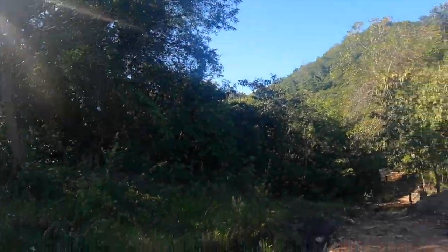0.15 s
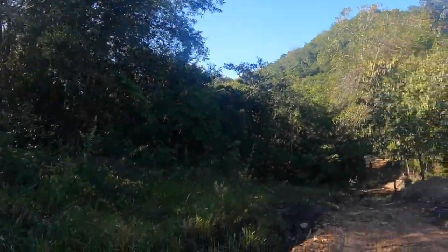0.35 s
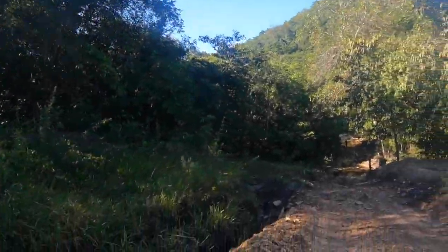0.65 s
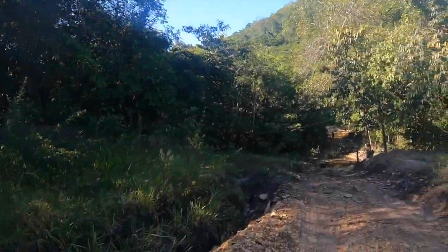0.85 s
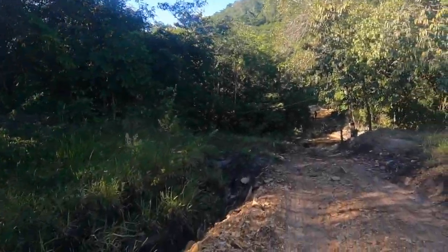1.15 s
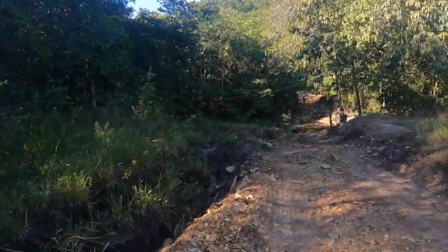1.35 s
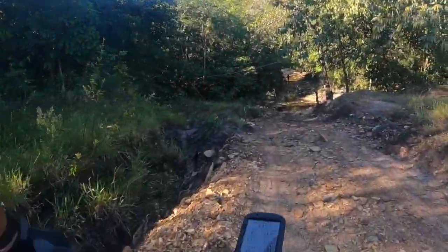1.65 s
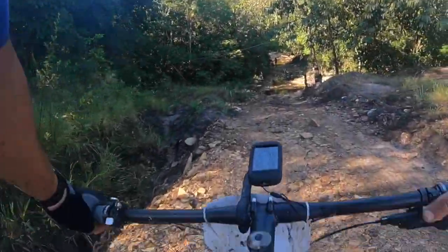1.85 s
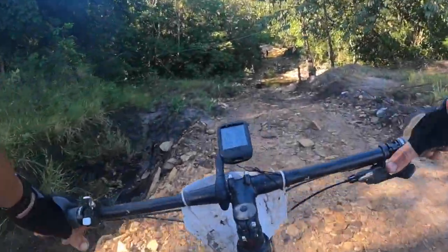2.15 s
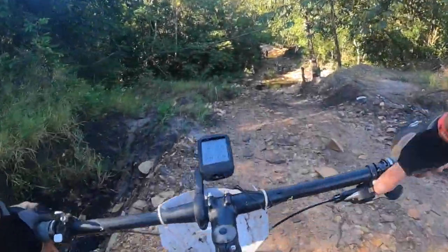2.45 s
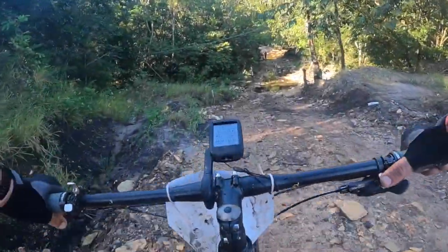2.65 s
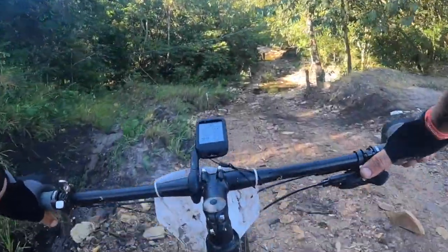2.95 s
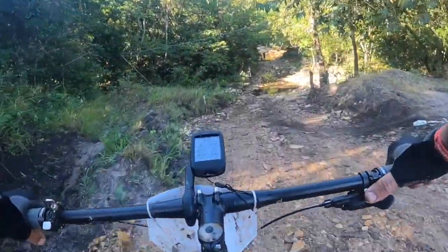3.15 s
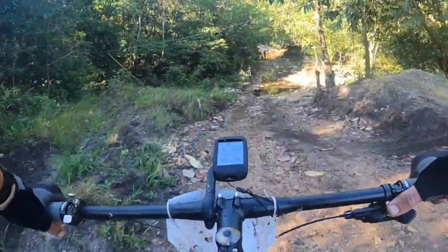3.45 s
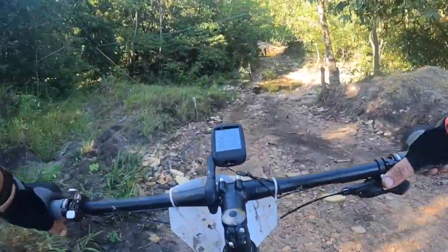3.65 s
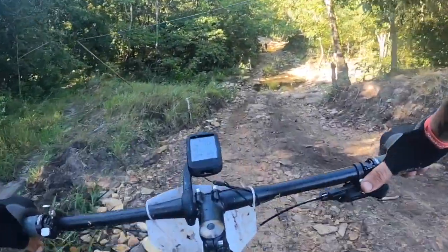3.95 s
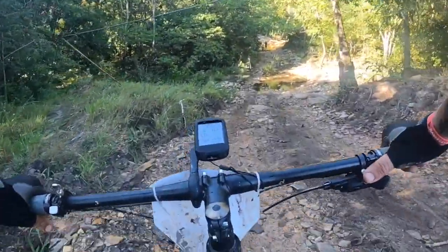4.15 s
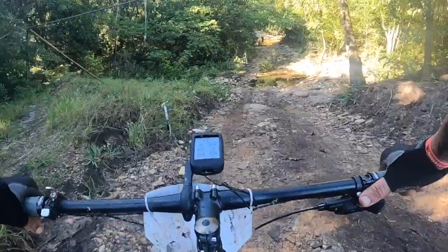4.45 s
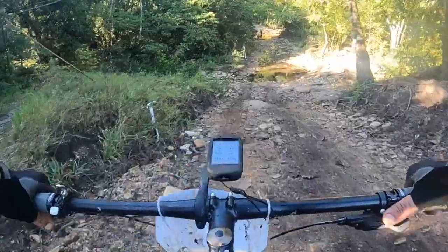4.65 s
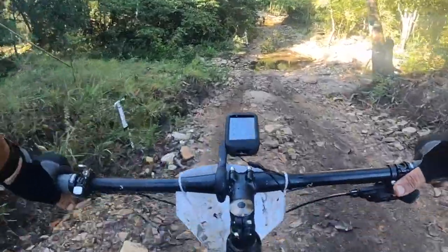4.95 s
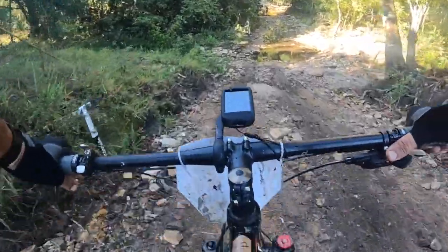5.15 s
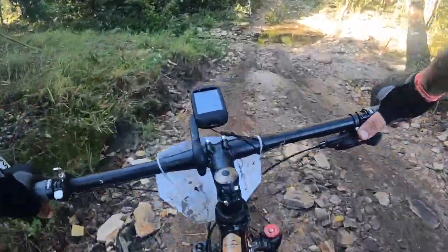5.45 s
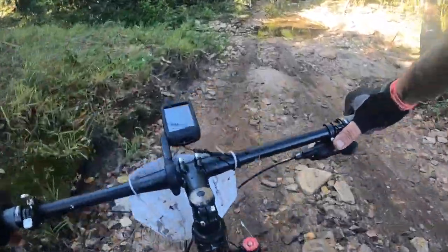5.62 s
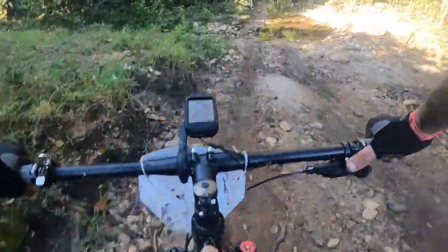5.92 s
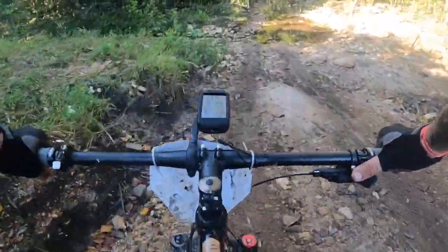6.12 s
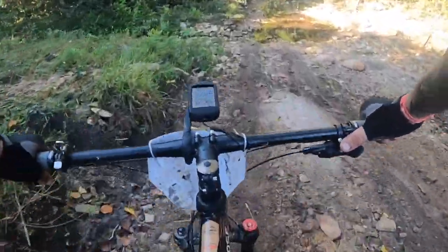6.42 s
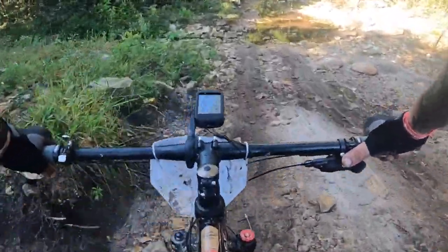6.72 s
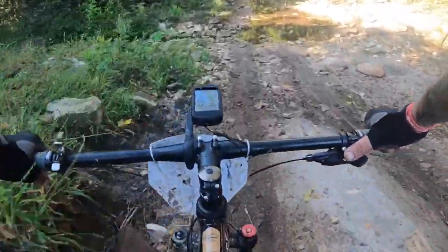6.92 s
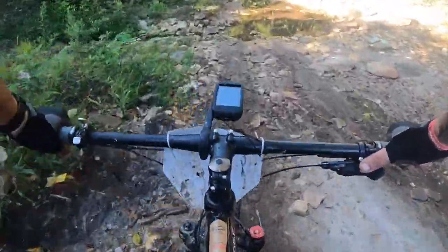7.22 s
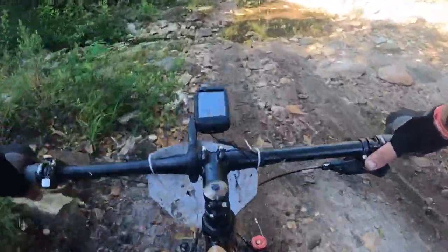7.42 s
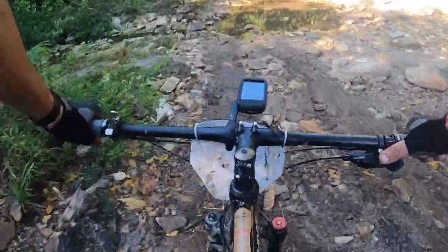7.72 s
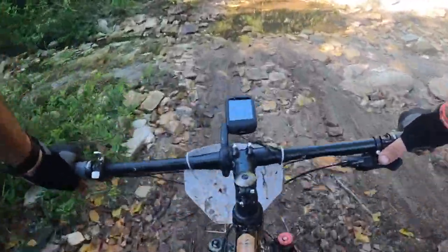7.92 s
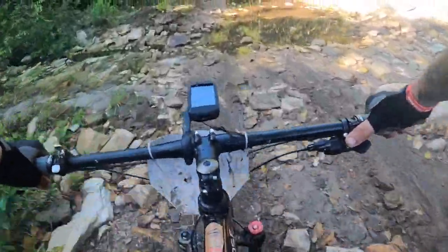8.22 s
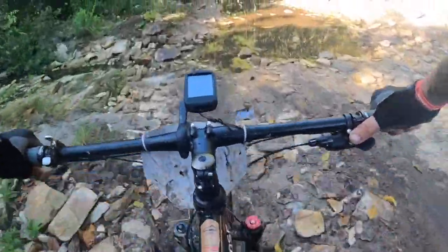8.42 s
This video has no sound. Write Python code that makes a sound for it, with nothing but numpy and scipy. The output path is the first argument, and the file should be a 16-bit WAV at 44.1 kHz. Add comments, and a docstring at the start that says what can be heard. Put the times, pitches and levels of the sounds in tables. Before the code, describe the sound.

Heard from the rider's own microphone outdoors, a mountain bike starts quietly with a brief wind thump and faint brake touches. Tyre crunch, pebble snaps and small chain ticks build, with hollow knocks on the frame. After about three seconds the disc brake begins a fluttering howl, growing loud and harsh over continued jolts, breaking off briefly and fading in weaker bursts near the end.

```python
"""A dragging disc brake howls close below microphones worn by the rider of a mountain bike on a stony trail:
stick-slip as a stack of fluttering partials on one wavering pitch. Stones knock the frame, pebbles snap and
chain and cables tick, all as damped sines with noise bursts. Frame jolting, tyre crunch, grit hiss and wind
buffeting are shaped noise. The stereo image opens for a few seconds and closes again."""
import sys
import numpy as np
from scipy import signal
from scipy.fft import rfft, irfft, next_fast_len
from scipy.io import wavfile
from scipy.ndimage import uniform_filter1d, minimum_filter1d, map_coordinates

SR = 44100
rng = np.random.default_rng(int(sys.argv[2]) if len(sys.argv) > 2 else 0)


def invert_db(level):
    """Linear amplitude ratio for a level in decibels (20 dB per decade), elementwise."""
    return 10 ** (np.asarray(level, dtype=float) / 20)


def store_wav(level_fs):
    """Save 16-bit WAV to argv[1]."""
    pcm = np.round(np.clip(np.atleast_2d(level_fs), -1, 1) * 32767)
    wavfile.write(sys.argv[1], SR, pcm.T.astype(np.int16))


N = 378378  # length in samples


def unit(x):
    """Scales a signal to rms 1."""
    return x / np.sqrt(np.mean(np.abs(x) ** 2) + 1e-20)


def along(points, hz):
    """Reads (f/Hz, value) points on a log frequency axis."""
    f, v = np.transpose(points)
    return np.interp(np.log(hz + 1), np.log(f + 1), v)


def curves(rows):
    """Draws straight lines between rows: one value per sample for each column after t."""
    s, *columns = np.transpose(rows)
    return [np.interp(np.arange(N) / SR, s, column) for column in columns]


def wobble(rate):
    """A smooth random curve with rate knots a second."""
    knots = rng.standard_normal(N // 100)
    return map_coordinates(knots, [np.arange(N) * rate / SR])


def swell(s, length):
    """A smooth rise to 1 and fall around time s, length seconds wide."""
    return np.exp(-((np.arange(N) / SR - s) / length * 2) ** 4)


def filtered(x, response):
    """Multiplies the spectrum of x by a response of frequency."""
    m = next_fast_len(N + 8192)
    return irfft(rfft(x, m) * response(np.fft.rfftfreq(m, 1 / SR)), m)[..., :N]


def rush(spectrum, lo_hz, hi_hz, spiky_db, grain_rate, lumpy_db, lump_rate):
    """Mid and side noise, grainy and lumpy alike; the mid has rms 1 between lo_hz and hi_hz."""
    grain = invert_db(spiky_db * wobble(grain_rate) + lumpy_db * wobble(lump_rate))
    noise = grain * rng.standard_normal((2, N))
    mid, side = filtered(noise, lambda hz: invert_db(along(spectrum, hz)))
    band = filtered(mid, lambda hz: (hz > lo_hz) & (hz < hi_hz))
    return np.array([mid, side]) / np.std(band)


def ping(t, hz, t60):
    """A struck resonance: a sine that falls by 60 dB in t60 seconds."""
    return np.sin(2 * np.pi * hz * t) * invert_db(-60 * t / t60)


def burst(t, shape):
    """White noise through a filter, as long as t."""
    return signal.lfilter(*shape, rng.standard_normal(len(t)))


def dull_burst(t):
    """Noise below 3200 Hz, for the dry part of stone sounds."""
    return burst(t, signal.butter(6, 3200 / (SR / 2)))


def add(track, s, sound, side):
    """Puts a sound into the mid track at time s and a share of it into the side track."""
    part = track[:, round(s * SR):][:, :len(sound)]
    part += np.outer([1, side], sound)[:, :part.shape[1]]


# the pad drags, catches, howls and stutters out:
# t/s, then level/dB of the fundamental, octave, third and fifth partial before dips
BRAKE_LEVELS = [(3.18, -53, -52, -60, -70), (3.22, -43, -43, -60, -72), (3.31, -30, -36.5, -62, -72),
                (3.511, -22, -39, -58, -73), (3.555, -36, -24.5, -49, -68), (3.62, -39, -35, -56, -68),
                (3.73, -35, -32.5, -54, -68), (3.785, -31, -44, -58, -68), (3.84, -28, -28, -58, -66),
                (3.95, -35, -29.5, -58, -68), (4.0, -28.5, -36, -41, -66), (4.04, -25.5, -27.5, -42, -63),
                (4.19, -32, -41, -46, -58), (4.23, -31, -33, -48, -68), (4.32, -36, -54, -58, -68),
                (4.44, -37.5, -54, -60, -71), (4.64, -24.5, -34.5, -59, -64), (4.68, -29.5, -44, -54, -64),
                (4.729, -23, -31, -51, -56), (4.88, -17, -34, -53, -53.5), (4.95, -24.5, -17.5, -32.5, -41),
                (5.01, -15.5, -23.5, -42, -57), (5.061, -29.5, -38, -59, -65),
                (5.18, -21.5, -24.5, -39, -52.5), (5.23, -19, -44, -47, -52), (5.28, -27, -24, -40, -54),
                (5.39, -20, -34.5, -50, -52), (5.449, -15, -20, -31.5, -45.5),
                (5.51, -23.5, -27.5, -39, -56.5), (5.54, -18.5, -17, -29.5, -43),
                (5.69, -15, -25, -32, -45.5), (5.77, -27.5, -18, -38, -48),
                (5.81, -18.5, -25.5, -33.5, -51), (5.915, -22, -28, -52, -58.5),
                (5.936, -29, -37, -54, -62.5), (5.99, -32, -50, -61, -66), (6.1, -38.5, -51, -62, -68.5),
                (6.25, -16, -18, -29.5, -41.5), (6.28, -16, -17.5, -35.5, -50.5),
                (6.34, -30, -39.5, -62, -66), (6.4, -20.5, -17.5, -35, -51.5),
                (6.55, -15.5, -26.5, -37, -44), (6.591, -23, -22.5, -37, -43), (6.76, -13, -25, -37.5, -47),
                (6.88, -20, -21.5, -38, -40.5), (6.969, -16, -26, -32.5, -43.5),
                (7.029, -24.5, -25, -48, -58.5), (7.2, -22, -19, -30.5, -43),
                (7.24, -17, -32.5, -51, -59.5), (7.3, -21, -23, -42, -49.5),
                (7.39, -32, -41.5, -73.5, -83.5), (7.42, -23, -38, -47.5, -59),
                (7.56, -22, -24.5, -38.5, -46.5), (7.63, -20, -21.5, -26.5, -43.5),
                (7.74, -19, -19.5, -38.5, -47.5), (7.78, -19.5, -19.5, -34, -42),
                (7.86, -20, -23, -35, -49.5), (7.92, -15.5, -30, -33, -44.5), (7.999, -17, -16, -41, -50),
                (8.025, -39.5, -37, -52, -53.5), (8.08, -29.5, -31.5, -50, -54), (8.19, -36, -48, -61, -66),
                (8.26, -33.5, -29.5, -45, -57.5), (8.29, -23.5, -41, -69, -59.5),
                (8.32, -29, -42, -53, -61), (8.38, -36, -45.5, -73, -60), (8.45, -21.5, -40, -57, -65),
                (8.515, -22, -40, -54, -60), (8.58, -37, -37, -52, -54)]
# pitch of the brake before its wavering, higher and looser under a light touch: t/s, f/Hz
BRAKE_PITCH = [(3.2, 858), (3.32, 875), (3.4, 866), (3.46, 900), (3.52, 862), (3.68, 858), (3.84, 884),
               (3.92, 864), (4.05, 878), (4.15, 900), (4.24, 868), (4.6, 860), (5.3, 858), (5.6, 864),
               (6.3, 858), (7.15, 863), (7.32, 852), (7.6, 861), (8.58, 858)]
# first light touches of the pad, heard in the fundamental: middle t/s, length/s, level/dB
PAD_TOUCHES = [(0.086, 0.12, -41), (0.408, 0.18, -39)]
# jolts make the pad let go for a moment: middle t/s, length/s, dip/dB
PAD_LETS_GO = [(4.808, 0.048, 9), (4.858, 0.028, 14), (5.046, 0.017, 3), (5.124, 0.011, 7),
               (5.353, 0.035, 6.5), (5.947, 0.021, 14), (6.228, 0.0093, 6), (6.489, 0.038, 5),
               (6.652, 0.053, 3), (7.118, 0.012, 7), (7.185, 0.028, 4), (7.465, 0.013, 12.5),
               (7.649, 0.022, 2), (8.486, 0.029, 12)]
# upper partials of the disc: multiple of the fundamental, level/dB against the fifth partial at full bite
UPPER_PARTIALS = [(4, 3.5), (5, 3.5), (6, -12.5), (7, -11.5), (8, -15.5), (9, -10.5), (10, -22.5),
                  (11, -21.5), (12, -38.5), (13, -45.5), (14, -31.5)]


def brake():
    """Pad and disc stick and slip on one wavering pitch; each partial beats and fades on its own."""
    firm_db, bite_db = -25.5, -38  # fundamental below which it turns breathy; fifth partial at full bite
    fray, rasp = 0.12, 0.077  # fast fringe around each partial, and its growth per dB below firm
    waver, loose, jitter = 0.0025, 0.0003, 0.008  # slow pitch wobble, its growth per dB under bite; fast wobble
    burst_db, flare_db = 1.5, 2.5  # upper partials burst together, and each flares on its own

    start = (BRAKE_LEVELS[0][0] - 0.03, -80, -80, -80, -80)
    first_db, second_db, third_db, fifth_db = curves([start, *BRAKE_LEVELS])
    touches = [db - 40 * (1 - swell(s, length)) for s, length, db in PAD_TOUCHES]
    first_db = np.max([first_db, *touches], axis=0)
    fray = fray + rasp * np.clip(firm_db - first_db, 0, 20)
    dip_db = sum(db * swell(s, length) for s, length, db in PAD_LETS_GO)
    fifth_db = fifth_db + burst_db * wobble(22)

    slow = waver + loose * np.clip(bite_db - fifth_db, 0, 20)
    hz = curves(BRAKE_PITCH)[0] * (1 + slow * wobble(18) + jitter * wobble(220))
    phase = 2 * np.pi * np.cumsum(hz) / SR

    # multiple, level in dB, depth of flutter
    partials = [(1, first_db, 0.68), (2, second_db, 1.13), (3, third_db, 1.1)]
    # up to full bite, the high partials grow faster than the bite
    upper_db = fifth_db + 0.29 * np.minimum(fifth_db - bite_db, 0)
    partials += [(k, upper_db + db + flare_db * wobble(12), 0.9) for k, db in UPPER_PARTIALS]

    howl = np.zeros((2, N))
    for k, db, flutter in partials:
        rate = 30 + 45 * min(k, 3)
        mid_fade, side_fade = [unit(wobble(rate) + 1j * wobble(rate)) for _ in range(2)]
        fringe = fray * (wobble(260) + 1j * wobble(260)) / np.sqrt(2)
        mid_gain = (1 + flutter * mid_fade + fringe) / np.sqrt(1 + flutter ** 2 + fray ** 2)
        side_gain = unit(side_fade - 1.8)  # leans to the right
        tone = np.imag(np.array([mid_gain, side_gain]) * np.exp(1j * k * phase))
        howl += np.sqrt(2) * invert_db(db - dip_db) * tone
    return howl


# stones knock the frame: t/s, level/dB, f/Hz, crack level/dB against the thud before its own gains
FRAME_KNOCKS = [(1.247, -14.5, 447, -18), (1.55, -11, 338, -20), (1.849, -10.5, 123, -15),
                (3.52, -15.5, 500, -25), (3.836, -11, 287, -24), (3.866, -7, 280, -24),
                (4.015, -16, 100, -27), (4.332, -23, 276, -23.5), (4.392, -15.5, 300, -20),
                (4.687, -22, 155, -13.5), (4.767, -18, 300, -16.5), (4.804, -14.5, 199, -12.5),
                (4.816, -3.5, 416, -28), (4.836, -17, 455, -23), (5.016, -18.5, 110, -28.5),
                (5.076, -13, 169, -30.5), (5.196, -13, 181, -24), (5.243, -8, 127, -27.5),
                (5.259, -17, 337, -15.5), (5.396, -17.5, 117, -31.5), (5.573, -20.5, 374, -31.5),
                (5.762, -13, 337, -23), (5.795, -19, 300, -14.5), (5.828, -11, 400, -20.5),
                (5.862, -21, 300, -18), (5.966, -19, 292, -26.5), (6.113, -18, 111.2, -17),
                (6.148, -16.5, 346, -19.5), (6.199, -19, 161, -12.5), (6.216, -13, 254, -15),
                (7.37, -22.5, 200, -24.5), (7.007, -22, 250, -14.5), (7.56, -23, 290.7, -9.5),
                (7.65, -21.5, 143, -12.5), (8.011, -28, 300, -14), (8.041, -24, 350, -17.5),
                (8.072, -17.5, 300, -17.5), (8.128, -16.5, 280, -23), (8.17, -21, 180, -28),
                (8.274, -18, 320, -22.5), (8.468, -12.5, 139.7, -32), (8.508, -19, 116.4, -34)]


def knocks():
    """A stone rings the frame as two low damped sines with a noisy crack; small random thuds fill in."""
    thuds_per_s, thud_db, thud_hz = 30, 6, 300  # thud_db: least level over the jolting; pitch within an octave
    track, t = np.zeros((2, N)), np.arange(SR // 16) / SR
    tube = signal.butter(2, [700 / (SR / 2), 1400 / (SR / 2)], "band")
    jolt_db = ride_levels()[1] + stony()
    thuds = [(u * (N - 1) / SR, jolt_db[int(u * (N - 1))] + thud_db + 8 * v, thud_hz * 4 ** (w - 0.5), -22)
             for u, v, w in rng.random((int(thuds_per_s * N / SR), 3))]
    for s, db, hz, crack_db in [*FRAME_KNOCKS, *thuds]:
        thud = ping(t, hz, 6 / hz + 0.012) + 0.4 * ping(t, 0.467 * hz, 0.044)
        tube_crack = 4 * np.exp(-(t / 0.008) ** 2) * burst(t, tube)
        dull_crack = 1.2 * invert_db(-60 * t / 0.03) * dull_burst(t)
        knock = thud + invert_db(crack_db) * (tube_crack + dull_crack)
        onset = 1 - np.exp(-t / 0.0008)
        add(track, s, -invert_db(db) * knock * onset, rng.normal(0, 0.9))
    return track


# pebbles snap under the tyre: t/s, level/dB, f/Hz
PEBBLE_SNAPS = [(0.899, -11.5, 1360), (0.939, -25.5, 790), (0.982, -23, 1110), (1.202, -27, 1130),
                (1.235, -20, 2380), (1.38, -25, 915), (1.57, -18, 1310), (2.021, -16, 1310),
                (2.299, -18, 1600), (1.098, -19, 750), (1.317, -22, 1270), (1.354, -19.5, 1080),
                (1.421, -19.5, 596), (1.518, -16, 1280), (1.851, -15, 1030), (1.8555, -5.5, 1010),
                (1.861, -8, 1030), (1.928, -21, 1770), (1.958, -19, 970), (2.206, -20, 1600),
                (2.749, -15, 794), (2.867, -14.5, 1520), (2.963, -13, 1520), (3.056, -22, 1410),
                (3.174, -16.5, 2590), (3.225, -23.5, 1600), (3.3, -14, 1550), (3.724, -17, 2000),
                (4.185, -17, 2280), (4.354, -19, 1590), (4.506, -19.5, 1550), (5.96, -22, 910),
                (6.112, -25, 861), (6.202, -13, 825), (4.837, -13, 900), (8.278, -13.5, 850)]


def snaps():
    """A pebble snaps as two very short damped sines with dull noise; random grit crackles the same way."""
    # crackle_db: least level over the crunch; crackle pitch within an octave of crackle_hz
    crackle_per_s, crackle_db, crackle_hz = 110, 9.5, 1800
    track, t = np.zeros((2, N)), np.arange(SR // 16) / SR
    crunch_db = ride_levels()[2] + CRUNCH_SHARE * stony()
    crackle = [(u * (N - 1) / SR, crunch_db[int(u * (N - 1))] + crackle_db - 3 * np.log(v),
                crackle_hz * 4 ** (w - 0.5))
               for u, v, w in rng.random((int(crackle_per_s * N / SR), 3))]
    for s, db, hz in [*PEBBLE_SNAPS, *crackle]:
        tone = ping(t, hz, 3 / hz + 0.0046) + 0.4 * ping(t, 2.43 * hz, 0.0035)
        dry_noise = 0.35 * invert_db(-60 * t / 0.013) * dull_burst(t)
        onset = 1 - np.exp(-t / 0.00022)
        add(track, s, invert_db(db) * (tone + dry_noise) * onset, rng.normal(0, 0.6))
    return track


# chain and cables tick: t/s, level/dB, f/Hz
METAL_TICKS = [(0.5197, -36, 4560), (0.6175, -32, 4740), (0.9367, -27, 3680), (0.9545, -24.5, 3600),
               (0.9762, -29.5, 7200), (0.994, -29.5, 4620), (1.22, -35.5, 5100), (1.5334, -29.5, 4450),
               (2.0275, -32.5, 7460), (2.2636, -27, 6200), (2.2876, -21, 6300), (2.3338, -20.5, 8200),
               (2.378, -22, 8200), (2.4214, -22.5, 8560), (2.7089, -14.5, 5200), (2.9245, -19, 8360),
               (2.991, -23.5, 8600), (3.0147, -23, 8600), (3.027, -21.5, 4830), (3.161, -29.5, 4710),
               (3.7189, -31, 4500), (3.8363, 0.5, 6040), (3.8666, -28, 4775), (4.139, -18.5, 5900),
               (4.2976, -20, 5200), (4.4116, -22, 5020), (5.2604, -45, 4760), (5.8621, -29.5, 5165)]


def ticks():
    """Struck metal: a bright damped sine and a noise click whose tail rings on faintly."""
    faint_per_s, faint_db, faint_until_s = 1.8, 11.5, 4.6  # small random ticks; least level over the grit hiss
    tick_s, tail_db, tail_s = 0.007, -18, 0.03  # 60 dB decay times of tick and tail
    track, t = np.zeros((2, N)), np.arange(SR // 16) / SR
    grit_db = ride_levels()[3]
    faint = [(u * faint_until_s, grit_db[int(u * faint_until_s * SR)] + faint_db + 8 * v, 5000 + 3800 * w)
             for u, v, w in rng.random((int(faint_per_s * faint_until_s), 3))]
    sharp = signal.butter(3, [2800 / (SR / 2), 10000 / (SR / 2)], "band")
    for s, db, hz in [*METAL_TICKS, *faint]:
        click = burst(t, sharp) * (invert_db(-60 * t / tick_s) + invert_db(tail_db - 60 * t / tail_s))
        tick = 0.8 * ping(t, hz, tick_s) + 0.91 * click
        onset = 1 - np.exp(-t / 0.00004)
        add(track, s, invert_db(db) * tick * onset, rng.normal(0.15, 0.3))
    return track


# the ride on smooth ground: t/s, then level/dB of wind buffet, frame jolting, tyre crunch and grit hiss,
# each the mean level inside the reference band given to rush()
RIDE_LEVELS = [(0, -33.5, -36.5, -55, -70), (0.12, -58.5, -48, -54, -72.5), (1.24, -45.5, -46, -48, -62.5),
               (1.56, -46, -40, -48.5, -59.5), (2.73, -41, -36.5, -42, -53.5),
               (3.2, -42, -37.5, -43.5, -56.5), (3.88, -39, -36.5, -44, -54.5),
               (4.67, -41, -33.5, -47.5, -64.5), (5.16, -42.5, -35, -47, -66),
               (5.53, -40.5, -37.5, -48, -64), (5.77, -37.5, -42, -50.5, -66.5),
               (6.02, -40, -33.5, -47, -65), (6.3, -40, -43, -51.5, -69.5), (6.86, -48, -43, -50.5, -65.5),
               (7.47, -43, -38.5, -51, -72.5), (7.8, -42, -43, -52.5, -68.5), (8.5, -47, -36.5, -49.5, -65)]


def ride_levels():
    """Levels of buffet, jolting, crunch and grit along the trail, before any stony patch."""
    return curves(RIDE_LEVELS)


# stony patches of trail: middle t/s, length/s, rise of the jolting level/dB
STONY_PATCHES = [(0.4, 0.12, 2), (0.94, 0.22, 4), (1.382, 0.21, 3.5), (2.006, 0.11, 1.5), (2.31, 0.099, 2),
                 (3.838, 0.02, 16.5), (4.376, 0.084, 5), (4.819, 0.11, 11), (5.265, 0.12, 8),
                 (5.825, 0.14, 12), (6.142, 0.05, 11), (6.219, 0.042, 15.5), (7.03, 0.055, 7.5),
                 (7.102, 0.057, 10), (7.586, 0.047, 11), (8.081, 0.16, 11.5), (8.279, 0.076, 4)]
CRUNCH_SHARE, GRIT_SHARE = 0.9, 0.28  # shares of that rise


def stony():
    """Rougher ground shakes the bike harder: the rise in dB over all stony patches."""
    return sum(db * swell(s, length) for s, length, db in STONY_PATCHES)


# spectral shape of the shaken frame: f/Hz, relative level/dB
JOLT_SHAPE = [(53, -35.5), (90, -3.5), (129, -4.5), (231, 1), (312, 4), (377, -3.5), (452, 1), (642, -7),
              (700, -5), (910, -1), (1540, -120)]


def jolting():
    """The frame shaken by the trail: low lumpy noise, spikier on stony patches."""
    rise_db = stony()
    return invert_db(ride_levels()[1] + rise_db) * rush(JOLT_SHAPE, 87, 800, 2.0 + 0.1 * rise_db, 60, 2.2, 18)


# spectral shape of tyres on stones: f/Hz, relative level/dB
CRUNCH_SHAPE = [(350, -6), (600, -5.5), (827, -5.5), (906, -5), (984, 3), (1100, -2), (1200, -0.5),
                (3930, -12), (4600, -18), (5590, -41.5), (9460, -120)]


def crunching():
    """Tyres on stones: grainy mid-band noise, spikier on stony patches."""
    rise_db = stony()
    level = invert_db(ride_levels()[2] + CRUNCH_SHARE * rise_db)
    return level * rush(CRUNCH_SHAPE, 1065, 1447, 2.0 + 0.12 * rise_db, 250, 2.0, 25)


# spectral shape of fine grit: f/Hz, relative level/dB
GRIT_SHAPE = [(2350, -23.5), (3700, -1.5), (4360, -5.5), (4840, -3), (5440, -6.5), (6900, -7), (9220, -12),
              (10700, -25), (12500, -22), (13600, -36.5), (15000, -39), (16000, -51)]


def grit_hiss():
    """Fine grit under the tyres: finely grained treble noise."""
    level = invert_db(ride_levels()[3] + GRIT_SHARE * stony())
    return level * rush(GRIT_SHAPE, 4530, 4934, 1.5, 400, 2.5, 18)


# wind slaps one microphone port harder than the other: t/s, level/dB before the slap's own gains, f/Hz
WIND_SLAPS = [(2.19, -18, 120), (2.491, -11, 139), (2.565, -10, 151), (3.861, -24, 150), (3.975, -8, 120),
              (4.02, -2.5, 151)]


def slaps():
    """Short low pushes that differ between the ports, so they live mostly in the side track."""
    track, t = np.zeros((2, N)), np.arange(SR // 8) / SR
    for s, db, hz in WIND_SLAPS:
        push = ping(t, hz, 0.047) + 0.7 * ping(t, 0.41 * hz, 0.067)
        onset = 1 - np.exp(-t / 0.0022)
        add(track, s, 0.24 * invert_db(db) * push * onset, 5)
    return track


# spectral shape of wind on the microphone ports: f/Hz, relative level/dB
BUFFET_SHAPE = [(12, -32.5), (20, 11.5), (48, 4.5), (81, -3), (110, -6.5), (140, -38), (240, -120)]


def buffeting():
    """Wind on the microphone ports: very low, slowly heaving noise."""
    return invert_db(ride_levels()[0]) * rush(BUFFET_SHAPE, 30, 71, 0.87, 23, 0.98, 8.9)


# gain of the side track with the image open: f/Hz, level/dB
SIDE_SPREAD = [(30, 0.5), (110, 2.5), (250, -12), (450, -6), (800, 5), (2400, 6), (4400, -10.5), (9000, 2),
               (11500, -0.5), (15000, -2.5)]


def scene():
    """Sums all sources as mid and side, shapes the side, and turns them into left and right."""
    bike = brake() + knocks() + snaps() + ticks() + jolting() + crunching() + grit_hiss()
    mid, side = bike + slaps() + buffeting()
    side = filtered(side, lambda hz: invert_db(along(SIDE_SPREAD, hz)))
    return np.array([mid + side, mid - side])


def limited(x):
    """The recorder's limiter: gain falls smoothly as peaks within a few milliseconds near the ceiling."""
    ceiling_db, knee = -8, 6
    peak = -minimum_filter1d(-np.abs(x).max(0), size=SR // 200)
    gain = (1 + (peak / invert_db(ceiling_db)) ** knee) ** (-1 / knee)
    return x * uniform_filter1d(gain, size=SR // 200)


def low_pass(x):
    """Removes everything above the highest recorded frequency."""
    return signal.sosfilt(signal.butter(12, 16510, fs=SR, output="sos"), x)


# stereo image below the top treble: t/s, side gain/dB
IMAGE_WIDTH = [(0, -58), (.45, -56), (.8, -26), (1.5, -21), (2.2, -15.5), (3.0, -12), (4.1, -10),
               (4.4, -26), (4.7, -40), (4.8, -72.5), (8.58, -73)]


def record(dry):
    """The image below the top treble opens and closes again; then the limiter and a band limit."""
    wide_hz, top_hz = 11400, 15850  # the side stays whole above wide_hz; nothing passes top_hz
    mid, side = (dry[0] + dry[1]) / 2, (dry[0] - dry[1]) / 2
    top = filtered(side, lambda hz: hz > wide_hz)
    side = top + invert_db(curves(IMAGE_WIDTH)[0]) * (side - top)
    stereo = limited(np.array([mid + side, mid - side]))
    mix = filtered(stereo, lambda hz: hz < top_hz)
    return low_pass(mix)


dry = scene()
out = record(dry)
store_wav(out)
```